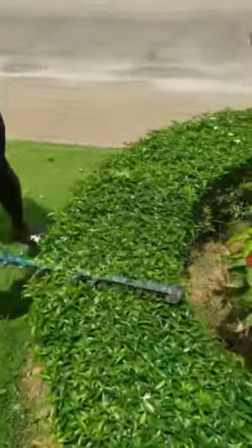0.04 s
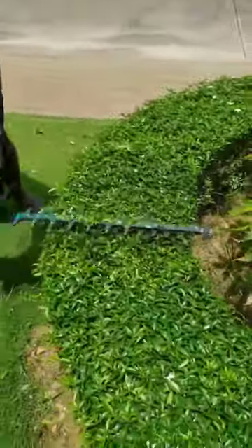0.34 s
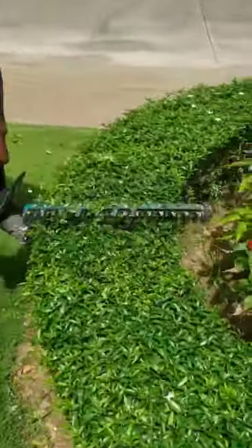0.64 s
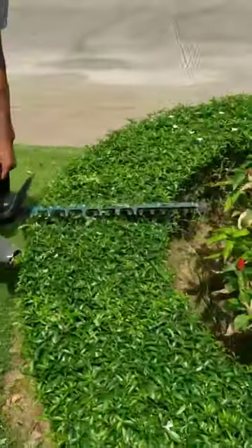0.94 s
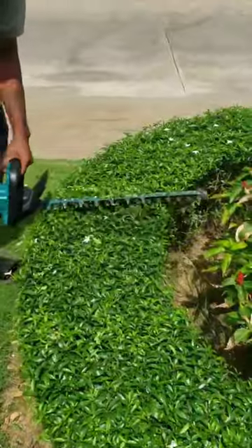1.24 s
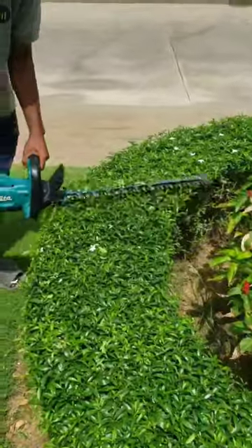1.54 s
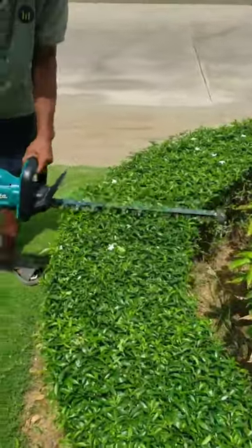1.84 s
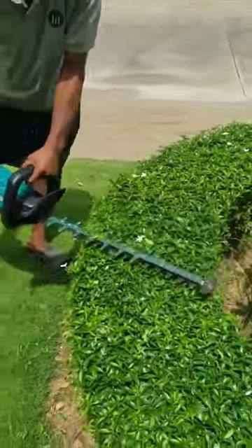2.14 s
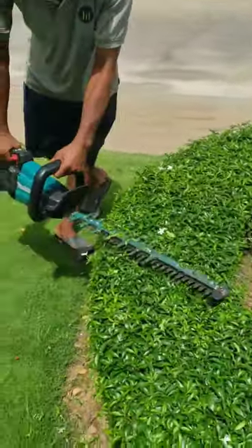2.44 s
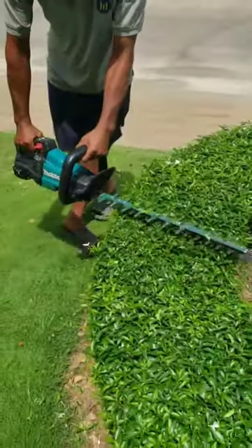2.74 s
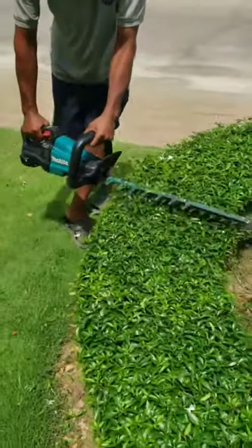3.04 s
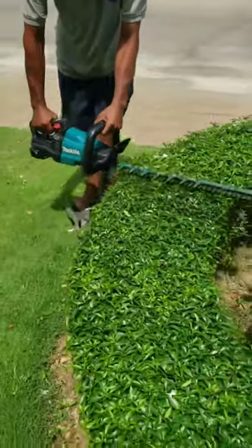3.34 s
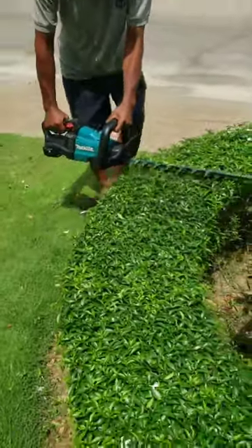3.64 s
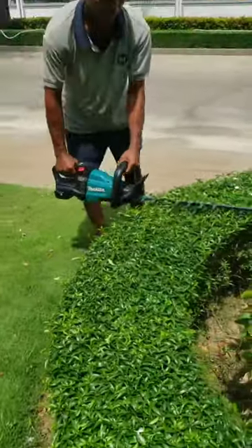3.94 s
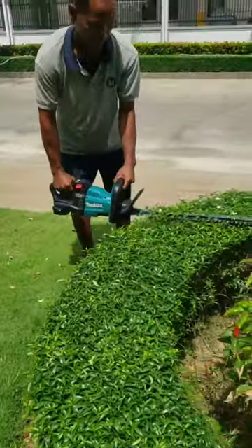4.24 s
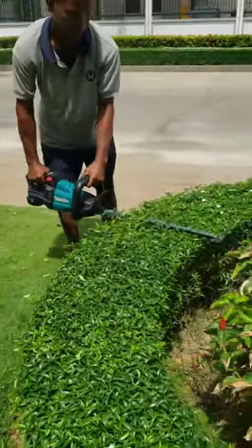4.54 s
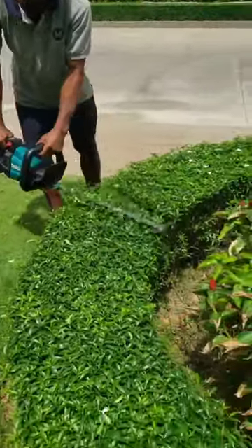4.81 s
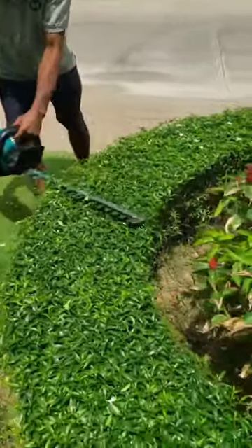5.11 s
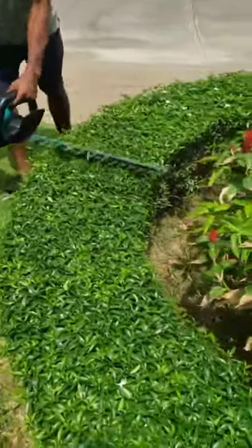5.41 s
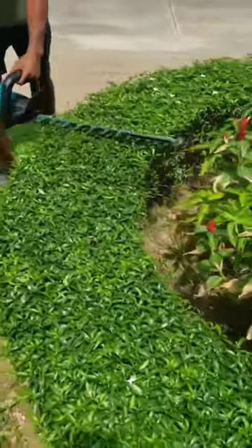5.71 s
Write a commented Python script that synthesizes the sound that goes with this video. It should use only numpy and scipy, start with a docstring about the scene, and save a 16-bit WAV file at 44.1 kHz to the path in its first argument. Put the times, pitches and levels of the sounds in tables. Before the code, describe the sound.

A cordless hedge trimmer runs without a break a few steps to the right of the microphone, cutting a low hedge outdoors. Its motor hums under a throbbing gear whine, the steel blades clatter and scrape rapidly, and leaves snap between the teeth. Light wind rumbles on the microphone, gusting hardest near the middle and then dropping away. A road is a faint, steady wash in the background.

```python
"""A throbbing gear whine comes first: a cordless hedge trimmer, a few steps off to the right of the
microphone, swept along a low roadside hedge. Its motor hums; at each reversal the blades knock and
scrape, and leaves snap between the teeth. The road is a faint wash behind it. A light wind rumbles
on the microphone, gusts hardest near the middle and drops again."""
import sys
import numpy as np
from scipy import signal
from scipy.fft import rfft, irfft, next_fast_len
from scipy.io import wavfile
from scipy.ndimage import uniform_filter1d

SR = 44100
rng = np.random.default_rng(int(sys.argv[2]) if len(sys.argv) > 2 else 0)


def generate_wav(sig):
    """Save sig (samples, or channels by samples) to the path in sys.argv[1] as 16-bit PCM at SR."""
    pcm = np.round(np.clip(np.atleast_2d(sig).T, -1, 1) * 32767).astype(np.int16)
    wavfile.write(sys.argv[1], SR, pcm)


N = 254456
BIN_HZ = np.fft.rfftfreq(N, 1 / SR)


def amp(db):
    """Decibels to gain."""
    return 10 ** (np.asarray(db) / 20)


def unit(x):
    """Scales to rms 1; a stereo pair by the rms of its middle."""
    return x / np.sqrt(np.mean(np.atleast_2d(x).mean(0) ** 2) + 1e-20)


def curves(table):
    """Each column of a time table at every sample."""
    times, *columns = np.transpose(table)
    return [np.interp(np.arange(N) / SR, times, column) for column in columns]


def at_hz(table, hz):
    """Reads a frequency table on a log axis."""
    f, value = np.transpose(table)
    return np.interp(np.log(hz + 1), np.log(f + 1), value)


def wander(rate):
    """Smooth random drift of rms 1, up to about rate changes a second."""
    size = next_fast_len(N, True)
    smooth = np.exp(-(np.fft.rfftfreq(size, 1 / SR) / rate) ** 2)
    return unit(irfft(rfft(rng.standard_normal(size)) * smooth, size)[:N])


def colour(x, spectrum):
    """Filters by a table of f/Hz, level/dB."""
    size = next_fast_len(N, True)
    gain = amp(at_hz(spectrum, np.fft.rfftfreq(size, 1 / SR)))
    return irfft(rfft(x, size) * gain, size)[..., :N]


def resonate(x, hz, width_hz):
    """A ringing band filter of gain 1 whose centre may move."""
    turn = np.exp(2j * np.pi * np.cumsum(hz * np.ones(N)) / SR)
    pole = np.exp(-np.pi * width_hz / SR)
    return 2 * (turn * signal.lfilter([1 - pole], [1, -pole], x / turn)).real


def patchy(x, depth_db, frames, bands):
    """Random patches of colour, frames long and bands wide."""
    spectra = signal.stft(x, nperseg=256, noverlap=192)[2]
    field = rng.standard_normal(spectra.shape[1:])
    field = uniform_filter1d(uniform_filter1d(field, bands, 0), frames, 1)
    return signal.istft(spectra * amp(depth_db * field / field.std()), nperseg=256, noverlap=192)[1][:, :N]


def bursts(train, rise_s):
    """Turns each impulse into an envelope that peaks after rise_s and dies away."""
    age = np.arange(SR // 20) / SR / rise_s
    return signal.oaconvolve(train, age * np.exp(1 - age))[:N]


def swell(start, length, rise_share=.26):
    """A gust or bite builds quickly and ebbs more slowly."""
    corners = [start, start + rise_share * length, start + length]
    return np.sin(np.pi / 2 * np.interp(np.arange(N) / SR, corners, [0, 1, 0]))


# likeness of the two channels at the microphone: f/Hz, correlation (clipped to 0-1)
COHERENCE = [(200, 1), (600, 0.5), (1500, 1.08), (2800, 0.24), (5000, -0.7), (8000, 0.6), (14000, -9.7)]
# balance at the microphone: f/Hz, left minus right/dB
BALANCE = [(300, -3.5), (1000, 0.5), (1600, -17), (2750, -10.5), (3500, -6.5), (4300, 0.5), (5000, -10),
           (6000, -16.5), (7300, -28.5), (8500, -11), (10500, -15), (12000, -13.5), (14000, -23),
           (15500, -2)]
def place(pair):
    """Turns two unrelated signals into one source to the right of the microphone."""
    a, b = rfft(pair)
    same = np.clip(at_hz(COHERENCE, BIN_HZ), 0, 1)
    side = amp(at_hz(BALANCE, BIN_HZ) / 2)
    left = same * a + np.sqrt(1 - same ** 2) * b
    return irfft(np.array([left * side, a / side]), N)


# how strongly the tool reaches the microphone on its way along the hedge: t/s, level/dB
SWEEP_LEVEL = [(0, 2.8), (.4, 1.8), (1.15, 1.1), (1.8, -2), (2.15, 1.2), (2.65, .5), (3, 1), (3.85, -1),
               (4.85, -1.7), (5.77, .5)]
def swept(level_db, follow):
    """Gain of a part of the tool that follows the sweep by its own share."""
    return amp(level_db + follow * curves(SWEEP_LEVEL)[0])


def mesh_tone(cycles, order, throb_db, peak_at, sag, slide, snag, limp_db, rough, lead):
    """Gear teeth sing loudest in mid-stroke, where the load also bends their pitch."""
    stroke = 4 * np.pi * (cycles - peak_at)  # two strokes a cycle
    drag = sag * np.sin(stroke) - slide * np.cos(stroke) + snag * np.sin(2 * stroke)
    phase = 2 * np.pi * order * cycles - drag + rough * wander(75)
    stroke_db = throb_db * np.cos(stroke) + 1.15 * np.cos(2 * stroke)
    stroke_db -= .7 * np.sin(2 * stroke)  # swells faster than it fades
    gain = amp(stroke_db - limp_db * np.cos(stroke / 2) + 1.4 * wander(36))
    left_lead = lead + .25 * wander(1.5)
    return unit(gain * np.array([np.sin(phase + left_lead), np.sin(phase)]))


# mesh tone, beaming at the microphone and away as the tool turns: t/s, level/dB
MESH_LEVEL = [(0, -26), (.38, -27.5), (.85, -34.5), (1.08, -37), (1.3, -45), (1.55, -35), (1.8, -44.5),
              (1.99, -33), (2.62, -35.5), (3, -30), (3.36, -30), (3.5, -33), (4, -31), (4.3, -34),
              (4.9, -29.5), (5.77, -33.5)]
# its octave: t/s, level/dB
OCTAVE_LEVEL = [(0, -40), (.18, -42.5), (.77, -33.5), (1.3, -49.5), (1.98, -41.5), (3.3, -46),
                (3.95, -47.5), (4.1, -40.5), (4.42, -40.5), (4.58, -48), (4.7, -41.5), (5.4, -39.5),
                (5.77, -46)]
# where the microphone hears the mesh tone: t/s, left minus right/dB
MESH_BALANCE = [(0, -7), (.9, -5), (1.55, -16), (2, -4), (2.7, -9), (3.55, -1), (4.05, -5.5), (4.9, -6.5),
                (5.6, 3)]
# how the load bends it: t/s, sag in mid-stroke/rad, downward slide through the stroke/rad
MESH_BEND = [(.35, .33, .35), (.8, 0, .9), (1.15, -.4, .5), (2.1, 0, .15), (3.25, .33, .2),
             (4.05, -.5, .05), (5.05, .15, .25)]
def gears(cycles, order=68):
    """The meshing teeth whine at a multiple of the blade rate, and an octave above."""
    tone_db, octave_db, side_db = (curves(table)[0] for table in (MESH_LEVEL, OCTAVE_LEVEL, MESH_BALANCE))
    sag, slide = curves(MESH_BEND)
    tone = mesh_tone(cycles, order, throb_db=5.9, peak_at=.06, sag=sag, slide=slide,
                     snag=.13, limp_db=.8, rough=.25, lead=1.15)
    octave = mesh_tone(cycles, 2 * order, throb_db=6.5, peak_at=.037, sag=.19, slide=.65,
                       snag=.087, limp_db=1, rough=.36, lead=1.63)
    sides = amp(np.array([side_db, -side_db]) / 2)
    return tone * sides / sides.mean(0) * amp(tone_db) + octave * amp([[-1.5], [1.5]]) * amp(octave_db)


# the rotor's low lines: multiple of the blade rate, relative level/dB
ROTOR_LINES = [(17, 0), (18, -11), (19, 0)]
# crank hum, centred between the channels: t/s, level/dB
CRANK_LEVEL = [(0, -65), (.8, -61), (1.8, -58), (3.4, -66.5), (5.77, -64)]
def motor(cycles):
    """The rotor and crank hum, and the reciprocating mass shakes twice a cycle."""
    lines = sum(amp(db + 2.05 * wander(18)) * np.sin(2 * np.pi * (order * cycles + rng.random()))
                for order, db in ROTOR_LINES)
    rotor = swept(-53.5, follow=1.4) * unit(lines) * amp([[-.6], [.6]])
    crank = amp(curves(CRANK_LEVEL)[0]) * unit(np.sin(2 * np.pi * 10 * cycles))
    shake = amp(-56) * unit(np.sin(4 * np.pi * cycles))
    return rotor + crank + shake


# the blades' two turning points: position/cycle, relative level/dB
TURNING_POINTS = [(.215, -2), (.732, -4.7)]
def reversals(cycles, spread_db, jitter_s, contrast=1):
    """An impulse each time the play in the drive is taken up; contrast deepens the strong-weak limp."""
    train = np.zeros(N)
    for position, db in TURNING_POINTS:
        late, strong = np.clip(rng.standard_normal((int(cycles[-1]), 2)), -1.4, 1.4).T
        onsets = np.searchsorted(cycles, np.arange(len(late)) + position) + late * jitter_s * SR
        train[np.clip(onsets.astype(int), 0, N - 1)] += amp(contrast * db + spread_db * strong)
    return train


# the gear case's band as it reaches the microphone, right of centre: t/s, level/dB, f/Hz
CASE_BAND = [(0, -41, 1700), (.6, -36.5, 1710), (1.05, -37.5, 1670), (1.5, -37, 1743), (2.4, -40.5, 1660),
             (2.85, -37.5, 1820), (3.3, -43.5, 1800), (3.6, -45, 1530), (4.5, -48, 1470),
             (5.77, -43.5, 1460)]
def gear_case(cycles):
    """Knocks and steady noise ring in a band whose pitch drifts as the tool moves and turns."""
    level_db, hz = curves(CASE_BAND)
    knocks = np.roll(reversals(cycles, spread_db=2, jitter_s=.00005), round(.0004 * SR))
    ring = unit(knocks) + 1.25 * rng.standard_normal(N)
    for width_hz in (240, 500, 900):  # three stages give steep skirts
        ring = resonate(ring, hz, width_hz)
    return amp(level_db) * unit(ring) * amp([[-5], [3]])


# modes of the blade bar: f/Hz, width/Hz
BAR_RESONANCES = [(2750, 250), (3480, 190)]
# they ring more or less as the bar lies on the hedge: t/s, lower level/dB, upper level/dB
BAR_LEVELS = [(0, -45, -40.5), (.55, -49, -39), (1.15, -40, -57), (1.95, -46, -47), (2.3, -38, -41),
              (2.8, -34, -42.5), (3.9, -48, -48), (4.8, -41, -54), (5.4, -38, -48), (5.77, -41, -49)]
def blade_bar(cycles):
    """The bar is rubbed into ringing, hardest at each reversal."""
    sound = np.zeros((2, N))
    for (hz, width), level_db in zip(BAR_RESONANCES, curves(BAR_LEVELS)):
        force = .7 + bursts(reversals(cycles, spread_db=2, jitter_s=.00025), rise_s=.0012)
        rub = force * rng.standard_normal((2, N))
        ring = resonate(resonate(rub, hz, width), hz, 2 * width)
        sound += amp(level_db) * unit(place(ring))
    return sound


# the housing's knock from a few steps away: f/Hz, level/dB
KNOCK_SPECTRUM = [(100, -12), (200, -2.5), (400, -3), (650, -2), (850, 2), (1150, 6.5), (1330, -10.5),
                  (1550, 0.5), (2000, 11.5), (2300, -0.5), (3200, -7), (6000, -38)]
def housing(cycles, smear_s=.004984):
    """Each reversal knocks the housing, which passes every frequency on after its own short delay."""
    knocks = reversals(cycles, spread_db=1.2, jitter_s=.00003)
    anchors_hz = np.arange(0, SR / 2, 140)
    delay_s = np.interp(BIN_HZ, anchors_hz, smear_s * rng.random(len(anchors_hz)))
    smeared = irfft(rfft(knocks) * np.exp(-2j * np.pi * np.cumsum(delay_s) * SR / N), N)
    pair = np.array([smeared, np.roll(smeared, round(.001485 * SR))])
    return swept(-42.5, follow=.66) * unit(colour(place(pair), KNOCK_SPECTRUM))


def friction(cycles, spectrum, rise_s, sliding, grain_db, contrast, spread_db=1.9):
    """Steel slides on steel all the time, and scrapes hard and grainy after each reversal."""
    force = sliding + bursts(reversals(cycles, spread_db, jitter_s=.0003, contrast=contrast), rise_s)
    noise = place(rng.standard_normal((2, N)) * force * amp(grain_db * wander(850)))
    noise = patchy(noise, depth_db=1.4, frames=5, bands=3)  # other teeth touch at each stroke
    noise = patchy(noise, depth_db=1.25, frames=220, bands=2)  # the bar radiates unevenly as it turns
    anchors_hz = np.arange(0, SR / 2, 70)  # the steel's many narrow modes ripple the spectrum
    ripple = amp(1.8 * np.interp(BIN_HZ, anchors_hz, rng.standard_normal(len(anchors_hz))))
    return unit(colour(irfft(rfft(noise) * ripple, N), spectrum))


# three bands of blade friction from a few steps away: f/Hz, level/dB
CLATTER_BAND = [(300, -14), (700, -11.5), (1200, -8), (1600, -6), (2250, -3), (2550, 0.5), (2850, -2),
                (3200, 5.5), (3500, -2), (3800, 1.5), (4400, -7.5), (6000, -18)]
SCRAPE_BAND = [(3000, -17), (4300, 2), (5000, 5), (5450, 1), (6150, 4.5), (6700, -3), (7500, -4.5),
               (7900, -8), (8400, -41), (9300, -24), (11000, -37)]
SIZZLE_BAND = [(5060, -43), (8600, -17.5), (9820, -11.5), (12000, 2.5), (13500, -5), (14700, -5),
               (15400, 3.5), (15800, -5)]
# the sizzle at the microphone: t/s, level/dB
SIZZLE_COURSE = [(0, -32.5), (1.6, -36), (2.35, -33), (3.05, -34.5), (3.85, -38), (4.8, -36.5), (4.98, -33),
                 (5.35, -33.5), (5.77, -35.5)]
# the teeth bite into denser parts of the hedge: t/s, length/s, extra scrape/dB
DENSE_GROWTH = [(0, 0.16, 1), (2.92, 0.17, 2.2), (4.42, 0.32, 2), (5.642, 0.16, 2)]
def blades(cycles):
    """The sliding blades make the bar clatter and the edges scrape and sizzle."""
    clatter = friction(cycles, CLATTER_BAND, rise_s=.0025, sliding=.41, grain_db=.5, contrast=2.5,
                       spread_db=.7)
    scrape = friction(cycles, SCRAPE_BAND, rise_s=.0017, sliding=.44, grain_db=.7, contrast=1.8)
    sizzle = friction(cycles, SIZZLE_BAND, rise_s=.0025, sliding=.32, grain_db=1.4, contrast=2.1)
    bite_db = sum(db * swell(start, length) for start, length, db in DENSE_GROWTH)
    return (swept(-36, follow=.46) * clatter
            + swept(-34.5 + bite_db, follow=.82) * scrape
            + amp(curves(SIZZLE_COURSE)[0]) * sizzle)


def snips(cycles, per_s=160, spread_db=3):
    """Leaves and thin twigs snap between the closing teeth."""
    closing = bursts(reversals(cycles, spread_db=3, jitter_s=.0016), rise_s=.0014)
    chance = closing / closing.mean() * per_s / SR
    snaps = (rng.random(N) < chance) * amp(spread_db * rng.uniform(-1, 1, N))
    crackle = place(bursts(snaps, rise_s=.00038) * rng.standard_normal((2, N)))
    spectrum = [(600, -34), (2500, -1), (7000, -25), (8500, -25), (12000, 2), (16000, 20)]
    return amp(-48) * unit(colour(crackle, spectrum))


# the road beside the hedge: f/Hz, level/dB
ROAD_SPECTRUM = [(25, -8), (65, -9), (200, -12), (400, -5.5), (1200, -6.5), (4000, -32), (12000, -48)]
def road():
    """The road is a faint, steady wash of noise."""
    return amp(-54.5) * unit(colour(place(rng.standard_normal((2, N))), ROAD_SPECTRUM))


def buffet(spectrum, lump_db):
    """Lumpy turbulence, unrelated in the two channels."""
    lumps = np.array([wander(25), wander(25)])
    return unit(colour(rng.standard_normal((2, N)) * amp(lump_db * lumps), spectrum))


# rumble and flutter right on the microphone: f/Hz, level/dB
RUMBLE_BAND = [(15, -36), (25, -26), (33, -2.5), (45, -1.5), (60, -2), (90, -2.5), (140, -15), (220, -35.5),
               (400, -51)]
FLUTTER_BAND = [(60, -26), (130, 4.5), (200, -1), (290, -8.5), (450, -19.5), (900, -45)]
# the roadside breeze rises and drops again: t/s, level/dB
BREEZE_LEVEL = [(0, -56.5), (1.1, -49), (1.65, -50), (2.05, -41), (2.7, -37.5), (3.4, -40.5), (4.1, -48),
                (4.8, -55.5), (5.77, -63)]
# gusts that strike the microphone: t/s, length/s, rumble level/dB, flutter level/dB
MIC_GUSTS = [(0.654, 0.088, -39, -55), (1.03, 0.055, -40, -58), (1.174, 0.062, -36, -49),
             (1.235, 0.21, -37.5, -45), (1.83, .11, -35, -54), (1.936, 0.092, -29.5, -42),
             (2.126, .16, -32, -43.5), (2.281, 0.033, -47, -34.5), (2.423, 0.082, -35, -35),
             (2.505, 0.087, -29, -47), (2.603, 0.34, -32, -36.5), (3.04, 0.1, -33.5, -48),
             (3.185, 0.13, -34.5, -46), (3.57, 0.15, -44, -45.5), (3.738, .09, -39, -61),
             (4.235, .07, -38, -62)]
def wind():
    """Turbulent air rumbles on the microphone and flutters in the stronger gusts."""
    rumble = amp(curves(BREEZE_LEVEL)[0] + .5 * wander(7.7))
    flutter = rumble * amp(-12.5)
    for start, length, rumble_db, flutter_db in MIC_GUSTS:
        gust = swell(start, length)
        rumble = np.hypot(rumble, amp(rumble_db) * gust)
        flutter = np.hypot(flutter, amp(flutter_db) * gust)
    sound = rumble * buffet(RUMBLE_BAND, lump_db=2.1) + flutter * buffet(FLUTTER_BAND, lump_db=4.5)
    sound = colour(sound, [(15, -20), (48, -.5)])  # the microphone loses the deepest bass
    return sound * amp([[-2], [1.5]])


# blade cycles a second of the governed drive: t/s, f/Hz
BLADE_RATE = [(0, 29.559), (.45, 29.506), (1.4, 29.461), (1.62, 29.583), (1.9, 29.514), (2.8, 29.452),
              (3.5, 29.509), (3.85, 29.421), (4.3, 29.578), (4.78, 29.444), (4.95, 29.588), (5.3, 29.521),
              (5.77, 29.505)]
def scene():
    """The trimmer at the hedge, all its parts following one drive, with the wind and the road."""
    cycles = np.cumsum(curves(BLADE_RATE)[0]) / SR
    drive = gears(cycles) + motor(cycles)
    knocks = gear_case(cycles) + blade_bar(cycles) + housing(cycles)
    cutting = blades(cycles) + snips(cycles)
    return drive + knocks + cutting + wind() + road()


def record(dry, cutoff_hz=15850):
    """The recorder cuts the highest treble off steeply."""
    lowpass = signal.firwin(601, cutoff_hz, window=("kaiser", 9), fs=SR)
    return signal.oaconvolve(dry, lowpass[None], "same", axes=1)


dry = scene()
out = record(dry)
generate_wav(out)
```